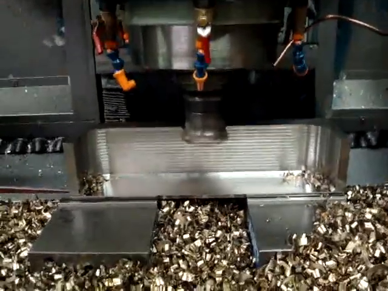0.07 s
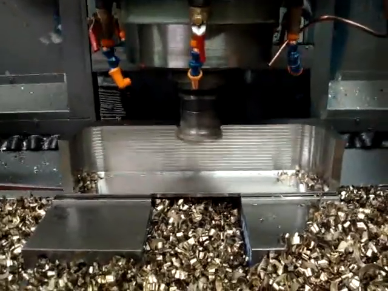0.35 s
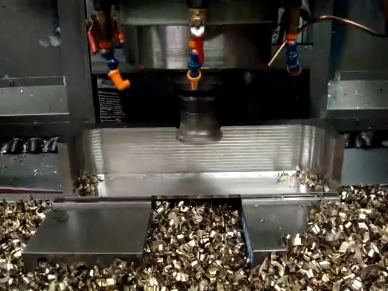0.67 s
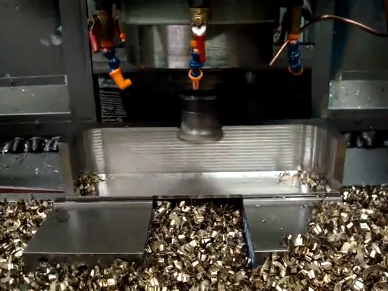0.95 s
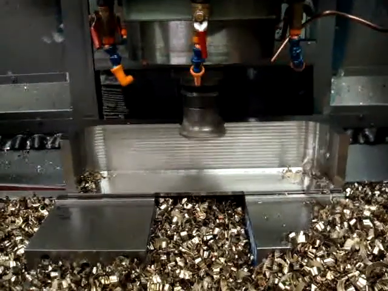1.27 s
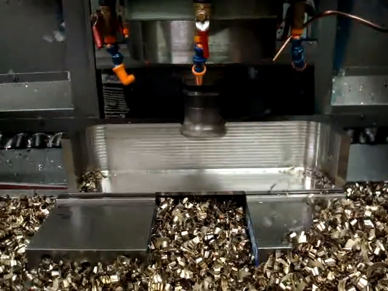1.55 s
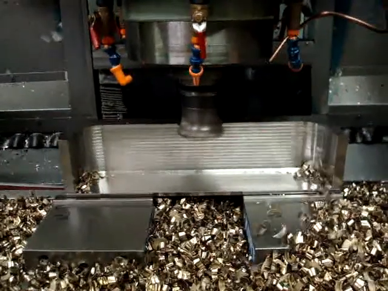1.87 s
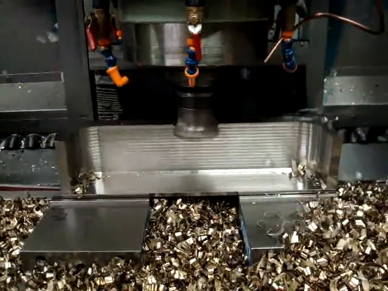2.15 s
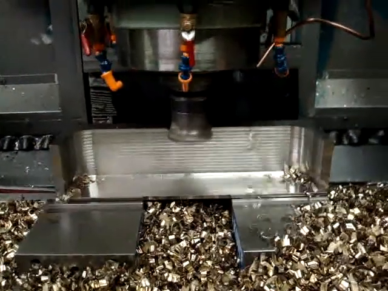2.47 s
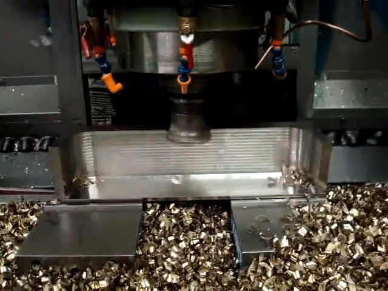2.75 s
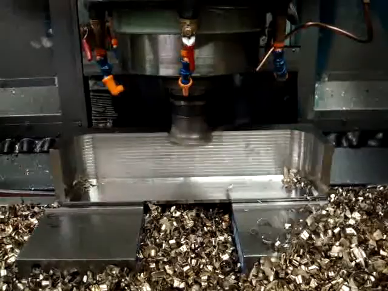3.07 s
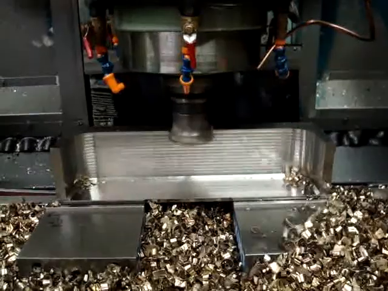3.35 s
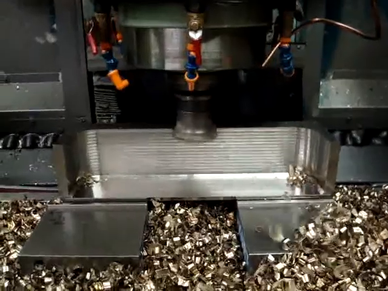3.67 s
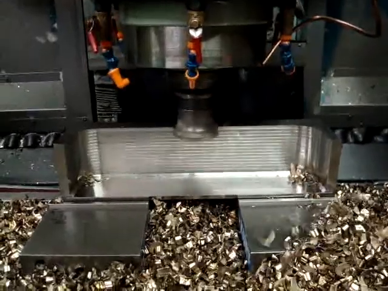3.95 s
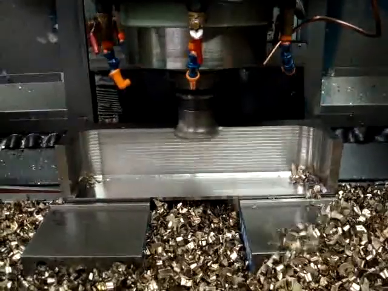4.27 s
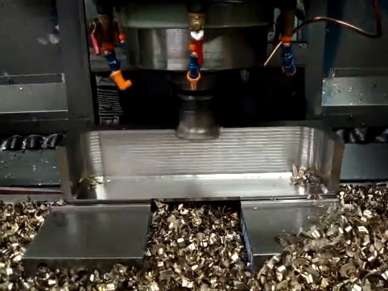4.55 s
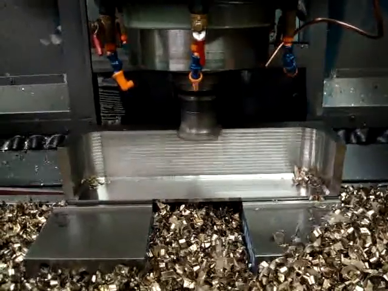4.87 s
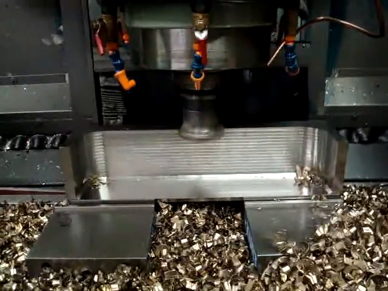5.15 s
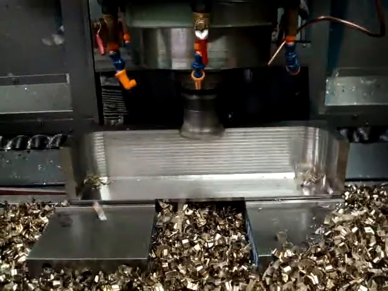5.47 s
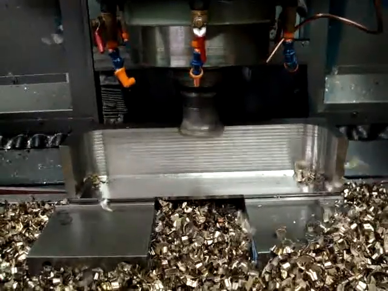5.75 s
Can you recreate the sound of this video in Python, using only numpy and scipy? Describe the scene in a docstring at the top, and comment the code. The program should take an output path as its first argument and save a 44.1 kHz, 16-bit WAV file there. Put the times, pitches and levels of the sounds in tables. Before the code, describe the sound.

From the start, an air jet hisses steadily inside a milling machine's enclosure, with a faint motor hum beneath it. A cutter works through steel in rapid, even knocks and rough scraping, while flung chips make many tiny, high pings. At about 0.6 seconds the scraping flares and the metal gives thin, high squeals, which fade by about 1.8 seconds. From around 0.9 seconds the gears whine under load and the workpiece rings with a sustained tone. Loose sheet metal rings faintly now and then. The grinding gradually grows a little fuller, with a low rumble and a slight, quick throb. From 4.3 seconds until the end, near 6 seconds, thick chips give way in a run of short, dull crunches over the continuing hiss and cutting. The metal walls add a very short echo.

```python
"""A five-insert face mill at 480 rpm works along a steel pocket inside a machine enclosure. From the start an
air jet hisses, the motor hums and flung chips ping, while each insert knocks as it bites, then tears and
scrapes off a chip. From 0.6 s the metal squeals as the cut takes hold; the gears take the load and whine, and
the workpiece sings. As the cut deepens the pocket wall joins in and the cutter throbs faintly once a turn. From
4.3 s one proud insert bites harder, with dull crunches."""
import sys
import numpy as np
from scipy import signal
from scipy.fft import rfft, irfft
from scipy.io import wavfile

SR = 44100
rng = np.random.default_rng(int(sys.argv[2]) if len(sys.argv) > 2 else 0)


def dump_mix(stems):
    """Bounce the given channels to the path in sys.argv[1] as a 16-bit WAV at rate SR."""
    frames = np.atleast_2d(stems).T  # one column per channel
    limited = np.clip(frames, -1, 1)  # hard clip at full scale
    pcm = np.round(limited * 32767).astype(np.int16)
    wavfile.write(sys.argv[1], SR, pcm)


N = 260190
TIME = np.arange(N) / SR
SPINDLE_HZ, FIRST_BITE_S = 8.0, .0115
LOAD_S, LOAD_RISE_S = 0.87, 0.08


def undb(db):
    """Decibels to amplitude ratio."""
    return 10 ** (np.asarray(db) / 20)

def unit(x):
    """Normalisation to rms 1."""
    return x / np.sqrt(np.mean(x ** 2))

def curve(rows, column=1):
    """Linear interpolation of one table column over time."""
    rows = np.array(rows)
    return np.interp(TIME, rows[:, 0], rows[:, column])

def ramp(start_s, rise_s):
    """Linear rise from 0 to 1."""
    return np.clip((TIME - start_s) / rise_s, 0, 1)

def bump(s, reach_s):
    """Gaussian rise and fall around one moment."""
    return np.exp(-.5 * ((TIME - s) / reach_s) ** 2)

def walk(hz):
    """Low-pass noise: a smooth random fluctuation of rms 1, mostly slower than hz."""
    f = np.arange(N // 2 + 1) * SR / N
    return unit(irfft(rfft(rng.standard_normal(N)) / np.sqrt(1 + (f / hz) ** 4), N))

def crackle(spread_db):
    """Log-normal modulation: noise in dense tiny grains of unequal size."""
    noise = rng.standard_normal(N)
    grain_db = spread_db * np.repeat(rng.standard_normal(N), repeats=16)[:N]
    return unit(noise * undb(grain_db))

def ring(hz, width_hz):
    """Random excitation of a resonance gives narrow-band noise; its centre may move."""
    phase = 2 * np.pi * np.cumsum(hz * np.ones(N)) / SR
    return unit(walk(width_hz / 2) * np.cos(phase) + walk(width_hz / 2) * np.sin(phase))

def sing(hz, width_hz, tonal, drift=.15):
    """Partial locking: a share of a resonance's power gathers in one drifting tone."""
    pitch_hz = hz + drift * width_hz * walk(width_hz / 2)
    tone = np.sin(2 * np.pi * np.cumsum(pitch_hz) / SR)
    return np.sqrt(tonal) * unit(tone) + np.sqrt(1 - tonal) * ring(hz, width_hz)

def burst(s, length, hz, glide_hz_per_s, width_hz, tonal):
    """A transient resonance glides through its pitch under a half-sine envelope."""
    progress = ramp(s, length)
    swell = np.sin(np.pi * progress)
    tone = sing(hz + glide_hz_per_s * length * (progress - .5), width_hz, tonal) * swell
    return tone * np.linalg.norm(swell) / np.linalg.norm(tone)

def response(colour, modes=(), size=8192):
    """Minimum-phase impulse response of a broad spectrum with resonances and dips on top."""
    f = np.arange(size // 2 + 1) * SR / size
    hz, db = np.transpose(colour)
    db = np.interp(np.log(f + 1), np.log(hz), db)
    for centre, width, lift in modes:
        db = db + lift / (1 + (2 * (f - centre) / width) ** 2)
    cepstrum = irfft(np.log(undb(db)))
    cepstrum[1:size // 2] *= 2  # folding the cepstrum makes the response causal
    cepstrum[size // 2 + 1:] = 0
    return irfft(np.exp(rfft(cepstrum)))

def through(x, impulse):
    """Convolution with an impulse response."""
    return signal.fftconvolve(x, impulse)[:N]

def filtered(x, order, hz, side):
    """Maximally flat low-pass or high-pass filtering."""
    return signal.sosfilt(signal.butter(order, hz, side, fs=SR, output="sos"), x)

def enclosure(x, t60=0.097, wet_db=-14):
    """Reverberation: sheet-metal walls add a short dense tail."""
    t = np.arange(SR // 2) / SR
    tail = rng.standard_normal(len(t)) * np.exp(-np.log(1000) * t / t60)
    return x + undb(wet_db) * through(x, tail / np.linalg.norm(tail))

# Each row: time in seconds, share of the pocket wall in dB.
WALL_SHARE = [(0, -16), (.9, -17.5), (2, -11), (3.5, -6.5), (4.4, -4.5), (5.9, -3)]
def depth_db():
    """Coupling: the deeper the cut, the more the pocket wall takes part."""
    return curve(WALL_SHARE)

# Each row: time in seconds, base level of the cut in dB.
CUT_LEVEL = [(0, -39.5), (.55, -42.5), (.78, -39.5), (1.1, -36), (2.0, -35.5), (2.3, -37.5), (4.1, -36),
             (4.4, -34), (4.7, -34.5), (5.6, -33.5), (5.9, -33.5)]
# Brief swells. Each row: time and reach either side in seconds, workpiece and chip changes in dB.
CUT_SWELLS = [(1.93, 0.024, 2.3, -2), (2.65, 0.29, 1, -1.3), (3.23, 0.045, 2, 2), (4.46, 0.19, 0, 1.5),
              (5.73, 0.036, 0, 4), (5.88, .025, 2, 1)]
def cut_db(runout_db=0.2, lag_s=0.012):
    """Runout: an off-centre cutter modulates the cut's level once a turn, on top of its swells."""
    turn = np.cos(2 * np.pi * SPINDLE_HZ * (TIME - FIRST_BITE_S - lag_s))
    swells = sum(db * bump(s, reach) for s, reach, db, _ in CUT_SWELLS)
    return curve(CUT_LEVEL) + swells + runout_db * undb(depth_db()) * turn

# Each row: time in seconds, level in dB.
HUM_LEVEL = [(0, -70.5), (1.15, -69.5), (1.35, -64), (1.55, -78), (1.75, -68), (2, -74), (2.25, -65.5),
             (2.7, -70.5), (2.9, -77), (3.2, -64), (3.85, -75), (4.1, -66), (4.75, -74.5), (5.05, -60.5),
             (5.45, -75), (5.9, -65)]
def motor_hum(hz=118.6):
    """Amplitude modulation: the motor's low tone fades and returns."""
    return unit(np.sin(2 * np.pi * hz * TIME)) * undb(curve(HUM_LEVEL))

def spindle_tone(load, hz=533, idle_db=-55, loaded_change_db=-9.5, waver_db=2.4):
    """Free running: the spindle sings faintly, then drops back under load."""
    tone = np.sin(2 * np.pi * hz * TIME) * undb(waver_db * walk(11)) * ramp(0, rise_s=.35)
    return unit(tone) * undb(idle_db + loaded_change_db * load)

def gear_whine(load, hz=575.2, wander=0.0033, waver_db=2.4, octave_db=-2, base_db=-44):
    """Gear meshing: loaded teeth give a tone and its octave, louder as the cut deepens."""
    phase = 2 * np.pi * np.cumsum(hz * (1 + wander * walk(29))) / SR
    fundamental = np.sin(phase) * undb(waver_db * walk(22))
    octave = np.sin(2 * phase) * undb(octave_db + waver_db * walk(12))
    return unit(fundamental + octave) * load * undb(base_db + 0.19 * depth_db())

# Each row: start and length in seconds, pitch and bandwidth in Hz, level in dB.
PANEL_MODES = [(0, 0.12, 1162, 18, -43), (0, 0.11, 500, 23, -51), (0.094, 0.13, 605, 21, -48),
               (0, 0.62, 852, 14.4, -52.5), (.08, 0.57, 976, 16, -51), (1.5, 0.11, 858, 14, -46.5),
               (2.42, 0.32, 505, 9, -48.5), (3.02, 0.24, 715, 26.2, -45.5), (3.8, 0.97, 815, 10, -53),
               (4.3, 0.4, 735, 9.2, -51)]
def panel_rings(sag_widths=1.1, tonal=.5):
    """Plate resonance: loose sheet metal rings up, sags a little in pitch and dies away."""
    return sum(undb(db) * burst(s, length, hz, -sag_widths * width_hz / length, width_hz, tonal)
               for s, length, hz, width_hz, db in PANEL_MODES)

# Each row: frequency in Hz, relative gain in dB.
FRAME_COLOUR = [(30, -44), (90, -29.5), (130, -25.5), (160, 2.5), (180, -13), (200, 1), (240, -0.5),
                (280, 2), (305, -7), (360, 6.5), (450, -2.5), (800, -32), (3000, -59)]
def frame_rumble(age, force, push=0.46, push_s=.006, relative_db=-21):
    """Forced vibration: the heavy frame rumbles with the cut, nudged by each insert."""
    shake = rng.standard_normal(N) * (1 + push * force * np.exp(-age / push_s))
    return unit(through(shake, response(FRAME_COLOUR))) * undb(cut_db() + relative_db)

# The gap between cutter and wall. Each row: time in seconds, pitch in Hz, relative level in dB.
GAP_RESONANCE = [(0, 6390, -45), (1.2, 6540, -41), (2.6, 6530, -39), (3.5, 6720, -38.5), (4.4, 6860, -37.5),
                 (5.9, 6790, -42.5)]
# Each row: peak time and reach either side in seconds, pitch and bandwidth in Hz, relative level in dB.
HOLLOW_MODES = [(0.13, 0.65, 5040, 170, -41.5), (0.85, 1.35, 5320, 260, -43), (0.5, 1.56, 9630, 560, -38.5),
                (1.47, 0.79, 4385, 100, -43), (1.2, 2.8, 6275, 230, -42.5), (2.6, 4.4, 8445, 200, -44),
                (5.8, 1.2, 4840, 120, -45), (5.03, 0.76, 4080, 150, -45), (5.9, 0.77, 7260, 260, -42.5)]
def cavity_rings(gap_width_hz=750):
    """Cavity resonance: the jet rings the gap and the hollows that the cutter passes."""
    rings = ring(curve(GAP_RESONANCE), gap_width_hz) * undb(curve(GAP_RESONANCE, column=2))
    for s, reach, hz, width_hz, db in HOLLOW_MODES:
        rings += ring(hz, width_hz) * undb(db) * bump(s, reach)
    return rings

# Each row: frequency in Hz, relative gain in dB.
JET_COLOUR = [(100, -29), (250, -18), (600, -4), (1500, -2.5), (3000, -2), (4500, 2.5), (5700, 1),
              (6400, 3), (7600, 4), (9100, 2), (10200, 1.5)]
def air_jet(hiss_db=-29.5, rise_db_per_s=0.06, waver_db=0.76, flutter_db=1.53, split_hz=5000, ring_db=-1):
    """Turbulence: low and high hiss flutter apart, and the cavities follow the flow."""
    dip_db = -bump(2.87, reach_s=0.33)  # 1 dB softer mid-pass
    flow_db = rise_db_per_s * TIME + dip_db + waver_db * walk(10.3)
    spit = crackle(spread_db=1.2)
    spit = sum(filtered(spit, 5, split_hz, side) * undb(flutter_db * walk(72)) for side in ("low", "high"))
    hiss = unit(enclosure(through(spit, response(JET_COLOUR)))) * undb(flow_db + hiss_db)
    return hiss + cavity_rings() * undb(flow_db - flow_db.mean() + ring_db)

def chip_pings(per_s=150, low_hz=2396, high_hz=9916, t60=0.14, softest_db=-45, spread_db=9):
    """Damped free vibration: flung chips land at random, each with one short high ring."""
    t, out = np.arange(SR // 10) / SR, np.zeros(2 * N)
    for when, pitch, size in rng.random((int(per_s * N / SR), 3)):
        hz = low_hz + (high_hz - low_hz) * pitch
        ping = np.sin(2 * np.pi * hz * t) * np.exp(-np.log(1000) * t / t60)
        start = int(when * N)
        out[start:start + len(t)] += undb(softest_db + spread_db * size ** 2) * ping
    return out[:N]

# Each row: pitch and bandwidth in Hz, level in dB relative to the cut, tonal share from 0 to 1.
LONG_MODES = [(735, 12, -20, .7), (1019, 24, -15, .6), (1031, 13, -21.5, .5), (1217, 36, -25, 0.02)]
# Each row: pitch and bandwidth in Hz, level in dB at the wall's full share.
WALL_MODES = [(1246, 10, -50.5), (1970, 35, -52), (2480, 35, -49), (4795, 50, -46), (4050, 60, -48.5),
              (5830, 19, -56)]
def modal_drone(wall_tonal=0.49):
    """Light damping: the workpiece's modes sing under load; the wall's thin rings grow with depth."""
    body = sum(undb(db) * sing(hz, width_hz, tonal) for hz, width_hz, db, tonal in LONG_MODES)
    wall = sum(undb(db) * sing(hz, width_hz, wall_tonal) for hz, width_hz, db in WALL_MODES)
    return body * undb(cut_db()) * ramp(LOAD_S, LOAD_RISE_S) + wall * undb(depth_db())

# Each row: start and length in seconds, pitch in Hz, glide in Hz per second, bandwidth in Hz,
# level in dB, tonal share from 0 to 1.
EDGE_SQUEALS = [(.645, .055, 5216, 0, 140, -31.5, .55), (.658, .08, 4000, 1200, 170, -29.5, .45),
                (0.707, .1, 3440, -1, 80, -30.5, .8), (.708, .065, 3510, 0, 170, -31, .55),
                (.745, .14, 3930, -2000, 320, -34, .3), (.945, .25, 3860, 700, 300, -33.5, .22),
                (1.452, 0.38, 3945, 0, 420, -38, 0), (0.605, .25, 3650, -0.5, 1700, -31.5, 0.07)]
def squeals(age, throb=0.17, throb_s=.012):
    """Friction-excited vibration: a rubbing edge sings in gliding bursts, renewed by every insert."""
    out = sum(undb(db) * burst(s, length, hz, glide, width_hz, tonal)
              for s, length, hz, glide, width_hz, db, tonal in EDGE_SQUEALS)
    out = filtered(out, 4, hz=1800, side="high")  # keeps the squeals high and thin, with no low thump
    return out * unit(1 + throb * np.exp(-age / throb_s))

def scrape_db(base_db=-35.5, before_db=-1, entry_s=0.608, attack_s=0.046, release_s=0.11, flare_db=4):
    """Envelope of the scraping: light at first, a flare on entry, then easing slightly, with swells."""
    since = np.maximum(TIME - entry_s - attack_s, 0)
    entered = ramp(entry_s, attack_s)
    flare = flare_db * entered * np.exp(-since / release_s)
    swells = sum(db * bump(s, reach) for s, reach, _, db in CUT_SWELLS)
    return base_db - 0.04 * depth_db() + before_db * (1 - entered) + flare + swells

# Chip and cutter. Each row: frequency in Hz, relative gain in dB.
CHIP_COLOUR = [(700, -34.5), (1500, -8.5), (2100, -2), (3000, 2), (3450, -0.5), (4100, 3.5), (4800, -6),
               (6000, -11), (10000, -9)]
# Each row: centre and bandwidth in Hz, lift or dip in dB.
CHIP_RESONANCES = [(1915, 70, 7.5), (2455, 130, 3.5), (2695, 110, -7.5), (2770, 28, 7.5), (2900, 150, 2.5),
                   (3210, 75, 2), (3440, 100, -3), (3760, 100, 5), (4100, 86, 4), (4430, 57, 5.5)]
def scraping(age, force, bite=.3, bite_s=0.0068, flutter_db=.5):
    """Sliding friction: chips run up the inserts, hardest just after each bite."""
    rub = crackle(spread_db=2) * (1 + bite * force * np.exp(-age / bite_s))
    rub *= undb(flutter_db * walk(25))
    return unit(enclosure(through(rub, response(CHIP_COLOUR, CHIP_RESONANCES)))) * undb(scrape_db())

# Each row: frequency in Hz, relative gain in dB.
WORKPIECE_COLOUR = [(30, -31.5), (90, -23), (140, -28), (220, -22.5), (350, -16), (520, -6), (900, 1.5),
                    (1280, 1), (1480, -4), (1750, -3), (2000, -3), (2500, -1.5), (5000, -14),
                    (10000, -35.5)]
# Each row: centre and bandwidth in Hz, lift or dip in dB.
WORKPIECE_RESONANCES = [(514, 140, 4.5), (770, 40, -1), (860, 36, 3), (960, 95, 4), (1020, 29, 3),
                        (1231, 150, 4), (1433, 50, -3.5), (1540, 90, 3), (1770, 73, -9), (1923, 73, 5.5)]
def workpiece():
    """Impulse response of the workpiece and its table."""
    return response(WORKPIECE_COLOUR, WORKPIECE_RESONANCES)

# Each row: start in seconds, relative peak level in dB.
PROUD_BITES = [(4.286, -18.5), (4.463, -21), (4.638, -22.5), (4.789, -19), (4.888, -17), (4.988, -19),
               (5.137, -20), (5.262, -20), (5.387, -19), (5.512, -24), (5.637, -20.5), (5.762, -20),
               (5.863, -20), (5.887, -18)]
def heavy_bites(attack_s=.002, decay_s=0.0087, gain_db=-4, dull_hz=2000):
    """Impact: as the cut deepens, the proud lead insert bites harder with a short, dull crunch in the
    workpiece."""
    t, out = np.arange(SR // 20) / SR, np.zeros(2 * N)
    dull_body = filtered(workpiece(), 1, dull_hz, "low")
    push = (1 - np.exp(-t / attack_s)) * np.exp(-t / decay_s)
    for s, db in PROUD_BITES:
        crunch = through(rng.standard_normal(len(t)) * push, dull_body)
        start = int(s * SR)
        out[start:start + len(crunch)] += undb(db + gain_db) * crunch / np.abs(crunch).max()
    return enclosure(out[:N])

# Each entry: relative force of one insert in dB.
INSERT_FORCES = [-8.5, -5.5, -7, -7.5, -9]
def inserts(scatter_db=1.0):
    """Periodic excitation: seconds since the latest insert bit, and how hard it bit."""
    tooth_hz = SPINDLE_HZ * len(INSERT_FORCES)
    passes = (TIME - FIRST_BITE_S) * tooth_hz
    bite = np.floor(passes).astype(int)
    scatter = scatter_db * rng.standard_normal(bite.max() + 2)
    force_db = np.array(INSERT_FORCES)[bite % len(INSERT_FORCES)] + scatter[bite]
    return (passes - bite) / tooth_hz, undb(force_db)

# The pocket wall. Each row: frequency in Hz, relative gain in dB.
WALL_COLOUR = [(30, -35), (120, -25.5), (200, -14), (290, -3), (370, -1), (460, -8), (700, 1.5), (950, -5),
               (1200, -7), (1400, 3.5), (1620, 3.5), (1800, -10), (4000, -21.5), (10000, -32)]
def cutting(age, force, knock=.85, knock_s=0.0046, tear=0.49, tear_s=0.0091, gain_db=-0.3):
    """Impact and fracture: each insert knocks, then tears a thinning chip; workpiece and wall ring."""
    load = 1 + force * (knock * np.exp(-age / knock_s) + tear * np.exp(-age / tear_s))
    body = unit(through(crackle(spread_db=2.5) * load, workpiece()))
    wall = unit(through(crackle(spread_db=4.5) * load, response(WALL_COLOUR, WORKPIECE_RESONANCES)))
    share = undb(depth_db())
    blend = (body + share * wall) / np.hypot(1, share)  # constant power
    return unit(enclosure(blend)) * undb(cut_db() + gain_db)

# Each row: time in seconds, change of level in dB.
BRIEF_LULLS = [(.18, -0.5), (3.01, -1), (4.74, -2), (4.84, -1.5), (4.96, -2), (5.18, -1.5), (5.59, -3)]
def scene():
    """Superposition: cut, air and drive add at one point; all but the drive dips briefly in the lulls."""
    age, force = inserts()
    metal = cutting(age, force) + frame_rumble(age, force) + heavy_bites() + scraping(age, force)
    metal += squeals(age) + modal_drone() + panel_rings() + chip_pings()
    ease = undb(sum(db * bump(s, reach_s=0.019) for s, db in BRIEF_LULLS))
    load = 1 - np.exp(-np.maximum(TIME - LOAD_S, 0) / LOAD_RISE_S)
    drive = gear_whine(load) + spindle_tone(load) + motor_hum()
    mono = (metal + air_jet()) * ease + drive
    return np.array([mono, mono])

def record(dry):
    """Band limiting: an elliptic low-pass cuts the treble steeply above 9980 Hz."""
    return signal.sosfilt(signal.ellip(12, .2, 80, 9980, fs=SR, output="sos"), dry)


dry = scene()
out = record(dry)
dump_mix(out)
```